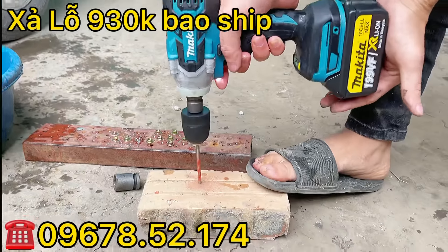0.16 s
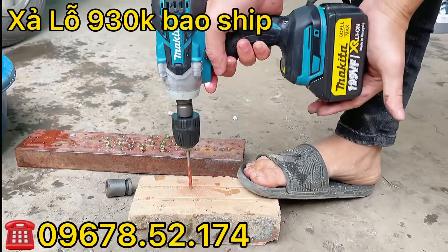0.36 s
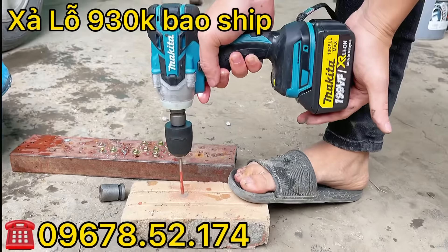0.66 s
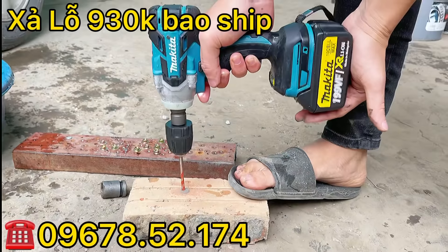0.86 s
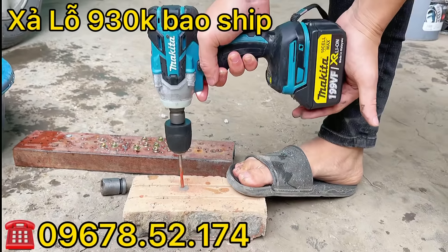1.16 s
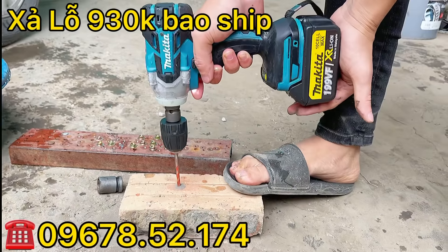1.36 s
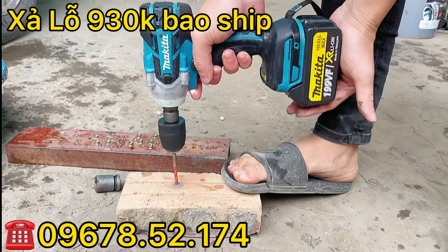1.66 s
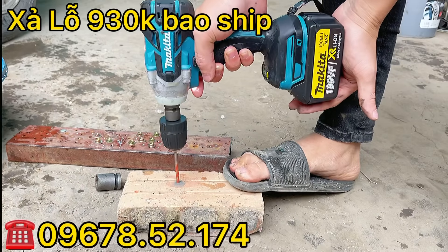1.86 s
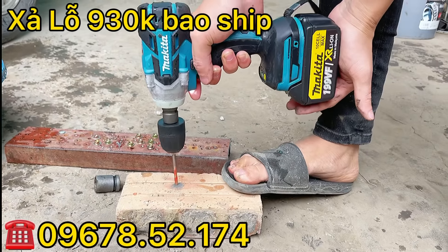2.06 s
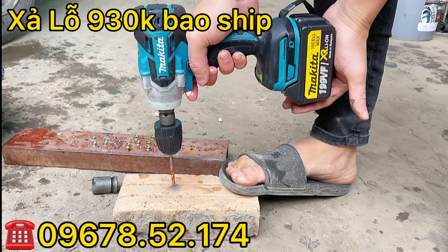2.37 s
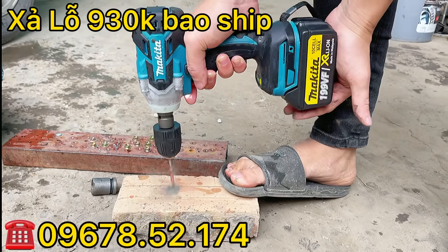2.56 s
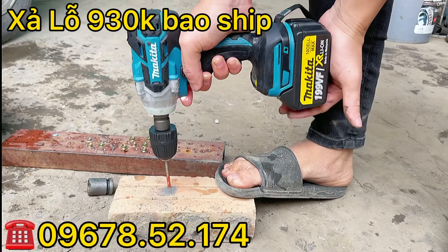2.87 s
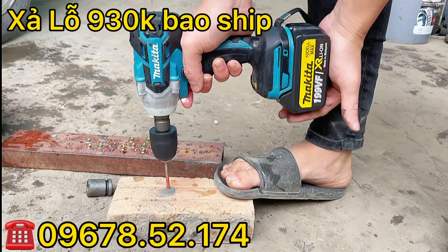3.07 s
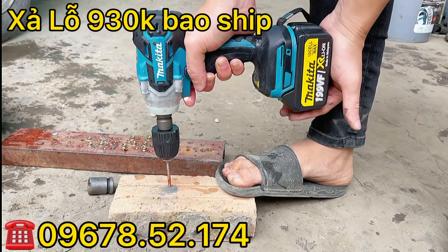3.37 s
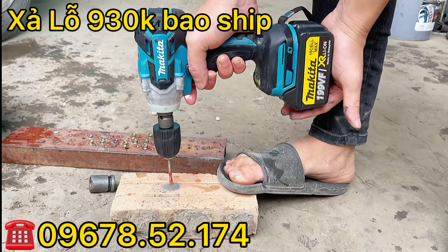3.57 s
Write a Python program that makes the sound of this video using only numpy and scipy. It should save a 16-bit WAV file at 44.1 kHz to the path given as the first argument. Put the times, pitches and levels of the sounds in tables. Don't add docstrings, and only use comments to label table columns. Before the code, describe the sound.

An impact drill clatters harshly on brick, steel cracking and grinding over a thin motor whine.

```python
import sys
import numpy as np
from scipy import signal
from scipy.fft import rfft, irfft
from scipy.io import wavfile
from scipy.ndimage import uniform_filter1d

SR = 44100
rng = np.random.default_rng(int(sys.argv[2]) if len(sys.argv) > 2 else 0)


def materialize(psi):
    bounded = np.clip(np.atleast_2d(psi).T, -1, 1)
    quanta = np.round(bounded * 32767).astype(np.int16)
    wavfile.write(sys.argv[1], SR, quanta)


def voltage_ratio(decibels):
    exponent = np.asarray(decibels, float) / 20
    return 10 ** exponent


N = 163170
HZ = np.fft.rfftfreq(N, 1 / SR)
BLOW_T = np.arange(3000) / SR


def evened(x):
    return x / np.sqrt(np.mean(x ** 2) + 1e-20)


def read(points):
    f, value = np.transpose(points)
    return np.interp(np.log(HZ + 1), np.log(f + 1), value)


def coloured(x, points):
    return irfft(rfft(x) * evened(voltage_ratio(read(points))), N)


def ring(x, modes):
    delay = np.exp(-2j * np.pi * HZ / SR)
    gain = 0
    for k, (hz, width_hz, db) in enumerate(modes):
        decay = -np.pi * width_hz / SR
        pole = np.exp(decay + 2j * np.pi * hz / SR)
        gain = gain + (-1) ** k * voltage_ratio(db) * (1 - np.exp(decay)) / (1 - pole * delay)
    return irfft(rfft(x) * gain / np.sqrt(np.mean(abs(gain) ** 2)), N)


def envelope(times, levels_db, shape, lead=0):
    train = np.zeros(N + 4000)
    np.add.at(train, np.round(times * SR).astype(int), voltage_ratio(2 * levels_db))
    return np.sqrt(abs(signal.oaconvolve(train, shape ** 2)[lead:lead + N]))


def grains():
    grains_per_s, spread_db = 16000, 1.8
    size = voltage_ratio(spread_db * np.minimum(rng.exponential(1, N), 5))
    size = size * (rng.random(N) < grains_per_s / SR)
    return evened(size * rng.standard_normal((2, N)))


def clicks(times, levels_db):
    train = np.zeros((2, N))
    apart = rng.random((len(times), 2))
    for path in (0, 1):
        at = np.round((times + .0005 * path * apart[:, 0]) * SR).astype(int)
        train[path, at] = voltage_ratio(levels_db) * np.sign(apart[:, 1] - .5 * path)
    return train


def wander(hz):
    return evened(signal.lfilter(*signal.butter(2, hz / SR * 2), rng.standard_normal(N)))


# (frequency [Hz], width [Hz], level [dB])
STEEL_MODES = [(4750, 450, -6), (6500, 500, -6), (8950, 550, -1), (10300, 1200, 0)]
# (frequency [Hz], level [dB])
CASE_COLOUR = [(200, -4), (700, -6.5), (1300, 0), (2500, -1), (4800, 4), (7500, 1.5), (10000, 5.5),
               (13500, -15.5)]


def anvil_crack(times, crack_db):
    rise_s, decay_s, burst_db, snap_db, wide_db = 0.00053, 0.0013, -4, 9.5, -9
    shape = np.minimum(BLOW_T / rise_s, 1) * np.exp(-BLOW_T / decay_s)
    crack = envelope(times, crack_db + burst_db, shape) * rng.choice([-1., 1.], (2, N))
    crack = crack + clicks(times + rise_s, crack_db + snap_db)
    return ring(crack, STEEL_MODES) + voltage_ratio(wide_db) * coloured(crack, CASE_COLOUR)


def chuck_rattle(times, rattle_db):
    decay_s, end_s, level_db = .012, .013, -0.48
    shape = np.exp(-BLOW_T / decay_s) / (1 + (BLOW_T / end_s) ** 8)
    return coloured(envelope(times, rattle_db + level_db, shape) * grains(), CASE_COLOUR)


# (centre [s], level [dB])
SKIDS = [(0.001, -19.0), (0.074, -16), (0.133, -13), (0.167, -12.5), (0.206, -14.5), (0.273, -16.5),
         (0.335, -19.5), (0.404, -27), (0.423, -17.0), (0.462, -15.0), (0.482, -14.5), (0.51, -21.0),
         (0.548, -17), (0.615, -16.5), (0.715, -15), (0.784, -15), (0.832, -14.5), (0.85, -24),
         (0.876, -20), (0.897, -18), (0.93, -19), (0.946, -14.5), (0.979, -16.0), (0.993, -18.0),
         (1.068, -24), (1.088, -18), (1.12, -22), (1.142, -23), (1.162, -15.5), (1.197, -24),
         (1.214, -17.5), (1.242, -20), (1.259, -14), (1.3, -20), (1.362, -17.5), (1.409, -14),
         (1.429, -19.5), (1.459, -15), (1.506, -19.0), (1.555, -18), (1.609, -16.5), (1.657, -19),
         (1.674, -21.5),
         (1.706, -19.5), (1.755, -16), (1.774, -23), (1.825, -19), (1.855, -15), (1.932, -15.5),
              (1.976, -20), (2.046, -16.5), (2.148, -19), (2.17, -17.5), (2.194, -16.5), (2.219, -14.5),
              (2.239, -22), (2.28, -14), (2.305, -15), (2.329, -16), (2.363, -17.0), (2.383, -13.0),
              (2.406, -17.5), (2.463, -17.5), (2.501, -21.5), (2.529, -17), (2.56, -19.0), (2.694, -14.5),
              (2.732, -15.5), (2.771, -21), (2.811, -18), (2.986, -17.0), (3.077, -14.5), (3.115, -17.5),
              (3.154, -18), (3.178, -19), (3.199, -17.5), (3.224, -20.0), (3.272, -23.5), (3.299, -19),
              (3.323, -19.5), (3.351, -20.5), (3.37, -20.5), (3.453, -20.0), (3.538, -17.5), (3.574, -15.0),
              (3.631, -16)]


def cam_skid():
    width_s, level_db, hum_db = .012, -0.2, -8
    centre, skid_db = np.transpose(SKIDS)
    offset = (BLOW_T - BLOW_T[1500]) / width_s
    skid = envelope(centre, skid_db + level_db, np.exp(-offset ** 2), lead=1500) * grains()
    jolt = envelope(centre, skid_db, np.exp(-(2 * offset) ** 2), lead=1500) * grains()
    return coloured(skid, CASE_COLOUR) + voltage_ratio(hum_db) * ring(jolt, BRICK_MODES)


# (time [s], level [dB])
PRESSURE_CURVE = [(0, -23), (.75, -27.5), (1, -24), (1.9, -23), (2.1, -18.5), (2.4, -26), (2.6, -30),
                  (2.8, -40), (3.1, -55), (3.25, -28), (3.5, -22.5), (3.7, -19)]


def grinding(times):
    lift_s, lift_db, level_db, flutter_db, hum_db = 0.018, -1.5, 1.6, 1.5, -8
    before_blow = np.exp(-(BLOW_T[::-1] / lift_s) ** 4)
    lift = envelope(times, 0 * times, before_blow, lead=len(BLOW_T))
    press_db = np.interp(np.arange(N) / SR, *np.transpose(PRESSURE_CURVE))
    press = voltage_ratio(press_db + level_db + flutter_db * wander(83))
    scrape = press * voltage_ratio(lift_db * np.minimum(lift, 1)) * grains()
    return coloured(scrape, CASE_COLOUR) + voltage_ratio(hum_db) * ring(scrape, BRICK_MODES)


# (frequency [Hz], width [Hz], level [dB])
BRICK_MODES = [(280, 35, -15), (407.6, 41, 0.5), (518, 111, -3), (586, 24, -6), (772, 63, -13.5),
               (1012, 113, 0), (1186, 165, -7), (1530, 55, 1), (2069, 110, -6), (2670, 135, -1)]


def brick_thud(times, blow_db):
    delay_s, swell_s, level_db, spread_db, knock_db = 0.000983, 0.0035, -13.5, 4, 11.5
    chance_db = spread_db * rng.standard_normal(len(times))
    shape = BLOW_T / swell_s * np.exp(1 - BLOW_T / swell_s)
    thud = envelope(times + delay_s, blow_db + level_db + chance_db, shape)
    knock = clicks(times + delay_s, blow_db + knock_db)
    return ring(thud * rng.standard_normal((2, N)) + knock, BRICK_MODES)


# (frequency [Hz], level [dB])
SHAKE_COLOUR = [(20, -2.5), (60, 10), (120, -8.5), (300, -30.5)]


def ground_shake(times, blow_db):
    decay_s, level_db, fall_db_per_s, spread_db = 0.0078, -24.5, 2.5, 2
    chance_db = spread_db * rng.standard_normal(len(times))
    shake_db = blow_db + level_db - fall_db_per_s * times + chance_db
    shake = envelope(times, shake_db, np.exp(-BLOW_T / decay_s))
    return coloured(shake * rng.standard_normal((2, N)), SHAKE_COLOUR)


# (centre [s], level [dB])
ROCKS = [(0.025, -36), (0.096, -24.5), (0.163, -32), (0.234, -33.0), (0.36, -30.0), (0.4, -35.0),
         (0.502, -33.0), (0.632, -32), (0.739, -36.0), (0.935, -40), (1.115, -42), (1.214, -33),
         (1.497, -37.0), (1.599, -35), (1.703, -34), (1.846, -27), (3.253, -34), (3.443, -33)]


def brick_rocking():
    swing_hz, width_s, level_db = 57.7, 0.0071, -1
    t = np.arange(N) / SR
    total = np.zeros(N)
    for centre, db in ROCKS:
        swing = np.sin(2 * np.pi * swing_hz * (t - centre))
        total += voltage_ratio(db + level_db) * np.exp(-((t - centre) / width_s) ** 2) * swing
    return total


# (frequency [Hz], width [Hz], level [dB])
GEAR_MODES = [(1313, 176, 1.5), (2610, 156, 0), (3573, 150, 4), (4890, 83, -1), (6280, 96, -14)]
# (frequency [Hz], level [dB])
FAN_COLOUR = [(500, -13), (1200, -2), (2000, -6), (4800, 6), (9000, 0.5), (11500, -1.5), (13500, -17.5)]


def motor():
    gears_db, fan_db, flutter_db = -30.5, -30.5, 1.2
    gears = voltage_ratio(gears_db) * ring(rng.standard_normal((2, N)), GEAR_MODES)
    fan = voltage_ratio(fan_db) * coloured(rng.standard_normal((2, N)), FAN_COLOUR)
    return voltage_ratio(flutter_db * wander(33)) * (gears + fan)


def wobble(x):
    shallow_db, shallow_hz, bite_s, wobble_db = -1.5, 2640, 0.75, 2.1
    hz, t, z = signal.stft(x, SR, nperseg=256)
    middle = np.exp(-(2 * np.log(hz / shallow_hz + 1e-9)) ** 2)[:, None]
    z = z * voltage_ratio(shallow_db * middle / (1 + (t / bite_s) ** 20))
    patches = uniform_filter1d(rng.standard_normal(z.shape), size=4, axis=1)
    patches = evened(uniform_filter1d(patches, size=7, axis=2))
    treble = np.minimum(hz / 3000, 1)[:, None]
    return signal.istft(z * voltage_ratio(wobble_db * patches * treble), nperseg=256)[1][:, :N]


# (frequency [Hz], likeness [0-1])
PORT_LIKENESS = [(100, .97), (1000, .6), (1600, .2), (4600, .45), (7000, .35), (10200, .85), (11200, .6),
                 (12000, .9)]
# (frequency [Hz], phase [rad])
PORT_PHASE = [(500, 0), (2500, -2), (5300, -3.5), (6200, -6), (8400, -6.6), (11700, 0), (12500, .3),
              (15200, 6.3)]
# (frequency [Hz], left minus right [dB])
PORT_LEAN = [(270, 0.5), (450, -3), (740, 4.5), (1400, 5), (1900, -1), (4800, 2.5), (6300, 1.5), (9000, 0)]


def ports(a, b):
    same = np.clip(read(PORT_LIKENESS), 0, 1)
    turn = np.exp(1j * np.interp(HZ, *np.transpose(PORT_PHASE)))
    lean = voltage_ratio(read(PORT_LEAN) / 2)
    right = same * turn * a + np.sqrt(1 - same ** 2) * b
    return irfft(np.array([a * lean, right / lean]), N)


# (time [s], crack [dB], rattle [dB])
BLOWS = [(0.0009, -2, -13.5), (0.038, -1.5, -18), (0.1014, -8, -8.0), (0.1343, -30.0, -14),
         (0.1697, -6, -16), (0.2364, -4.0, -12.5), (0.3075, -4, -10), (0.3345, -19, -24),
         (0.3638, -1.5, -14.5), (0.402, -16, -13.5), (0.424, -8, -24.0), (0.4609, -3, -30.0),
         (0.482, -15.0, -21), (0.511, -5, -14), (0.5761, -4, -14.5), (0.6466, -1.5, -14.5),
         (0.678, -2.5, -13), (0.7516, -3, -13.5), (0.7837, -21, -17), (0.8028, -30.0, -11),
         (0.85, -18, -10.5), (0.878, -30.0, -14), (0.8964, -24, -8.5), (0.945, -32, -12.5),
         (0.9932, -6, -14), (1.0423, -7, -10), (1.0882, -7, -13.5), (1.1235, -3, -24),
         (1.163, -30.0, -15.5), (1.2137, -14, -11.5), (1.2399, -31, -14), (1.2613, -30.0, -20),
         (1.3093, -11.0, -10.5), (1.3352, -4.5, -20), (1.3605, -9.0, -15.5), (1.4098, -5, -14),
         (1.4595, -8, -15.5), (1.5073, -17, -13.5), (1.5557, -8, -13), (1.6076, -4.5, -28),
         (1.6579, -1.5, -16), (1.7045, -5, -12.5), (1.7554, -9, -13.5), (1.8063, -10, -11.0),
         (1.8561, -5.5, -28), (1.9007, -2.5, -15.5),
         (1.932, -30.0, -17), (1.9786, -22, -10), (2.0066, -6, -30.0), (2.0184, -32, -11.5),
              (2.0467, -13, -35), (2.0676, -9, -12.5), (2.0933, -3, -15.0), (2.1226, -1, -12.0),
              (2.1484, -30.0, -13.5), (2.1955, -7, -12.5), (2.219, -15.0, -13.5), (2.2399, -21, -10),
              (2.2814, -18, -10.5), (2.3069, -17, -14), (2.3286, -10, -11.5), (2.3629, -30.0, -12.5),
              (2.381, -30.0, -12.5), (2.4092, -7.0, -30.0), (2.4348, -5, -11), (2.4667, -2.5, -14),
              (2.5012, -30.0, -11.5), (2.5311, -6.0, -12), (2.5823, -4, -15), (2.6173, -11, -12.0),
              (2.6577, -5.5, -10), (2.7337, -6.5, -34), (2.7716, -23, -9.5), (2.81, -5, -30.0),
              (2.8487, -7.0, -13.5), (2.8869, -3, -17), (2.9266, -15, -11), (2.9882, -3.5, -30.0),
              (3.0762, -14, -13), (3.1175, -3.5, -14), (3.1555, -5.0, -19), (3.1992, -6, -13),
              (3.25, -8, -10.5), (3.2993, -5, -10.5), (3.3533, -4, -14), (3.3994, -4, -14.5),
              (3.4529, -5.5, -13), (3.5013, -30.0, -11.0), (3.5411, -11, -16), (3.5924, -6, -11),
              (3.63, -10.0, -23), (3.6563, -14, -13.5), (3.679, -7.5, -14.5)]


def scene():
    times, crack_db, rattle_db = np.transpose(BLOWS)
    blow_db = np.maximum(rattle_db, crack_db - 8.5)
    tool = anvil_crack(times, crack_db) + chuck_rattle(times, rattle_db) + cam_skid()
    tool = tool + grinding(times) + motor()
    bass_cut = np.sqrt(1 + (135 / (HZ + 1)) ** 6)
    air = rfft(wobble(tool) + brick_thud(times, blow_db)) / bass_cut
    ground = rfft(ground_shake(times, blow_db) + brick_rocking())
    return ports(*(air + ground))


# (frequency [Hz], margin [dB])
TOP_MARGIN = [(10800, 26), (12200, 12), (12800, -11), (14300, -5), (15300, -4), (16000, -18)]
# (start [s], length [s])
TOP_GAPS = [(0.535, 0.036), (0.721, 0.025), (1.189, 0.03), (2.315, 0.025), (2.788, 0.016), (2.817, 0.025),
            (2.855, 0.027), (2.9, 0.025), (2.936, 0.04), (3.016, 0.034), (3.226, 0.02), (3.261, 0.019),
            (3.565, 0.074)]


def patchy_top(x):
    patch_db, follow = 7, .9
    hz, t, z = signal.stft(x, SR, nperseg=512)
    band = np.arange(len(hz)) // 8
    level_db = 10 * np.log10((abs(z[:, 140:]) ** 2).sum((0, 1)) + 1e-12)
    patches = evened(uniform_filter1d(rng.standard_normal((len(hz), len(t))), size=9, axis=1))
    patches = evened(patches[band] + patches[-1])
    gap = sum((t > s) & (t < s + length) for s, length in TOP_GAPS)
    empty = gap * (hz > 12900)[:, None]
    margin_db = np.interp(band * 8 * hz[1], *np.transpose(TOP_MARGIN))[:, None]
    keep = margin_db + patch_db * patches + follow * (level_db - np.median(level_db)) > 0
    return signal.istft(z * keep * (empty == 0), SR, nperseg=512)[1][:, :N]


def band_limit(x):
    return signal.sosfilt(signal.butter(12, 17100, fs=SR, output="sos"), x)


# (frequency [Hz], level [dB])
MIC_TOP = [(12500, 1), (13500, 1.5), (15600, 3), (16300, -51)]


def record(dry):
    limit = .88
    mic = irfft(rfft(np.clip(dry, -limit, limit)) * voltage_ratio(read(MIC_TOP)), N)
    return band_limit(patchy_top(mic))


dry = scene()
out = record(dry)
materialize(out)
```